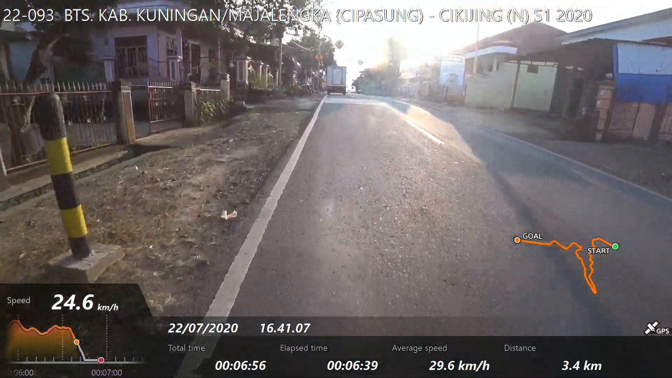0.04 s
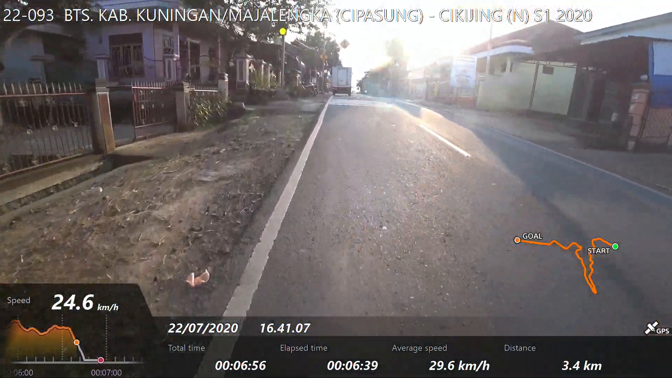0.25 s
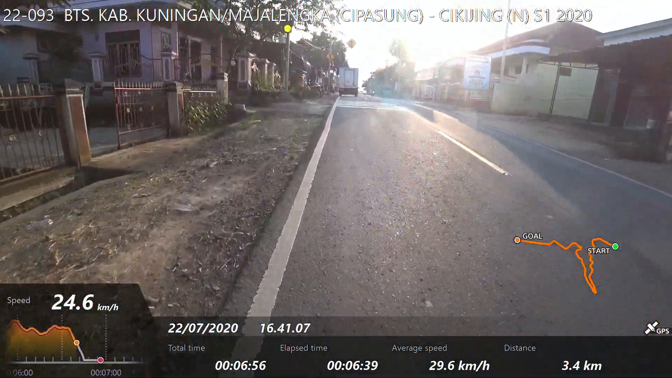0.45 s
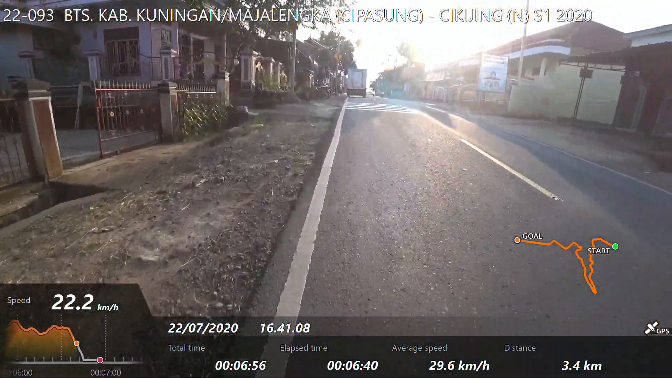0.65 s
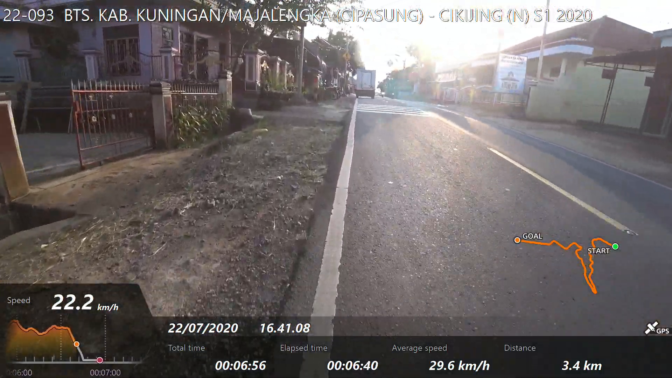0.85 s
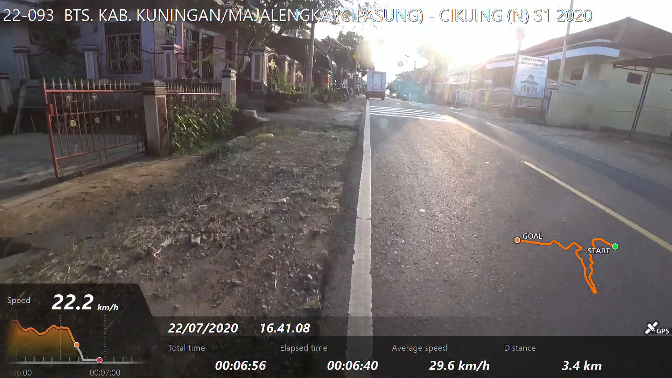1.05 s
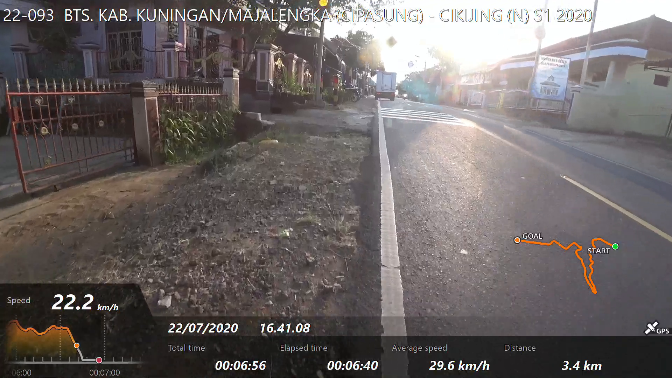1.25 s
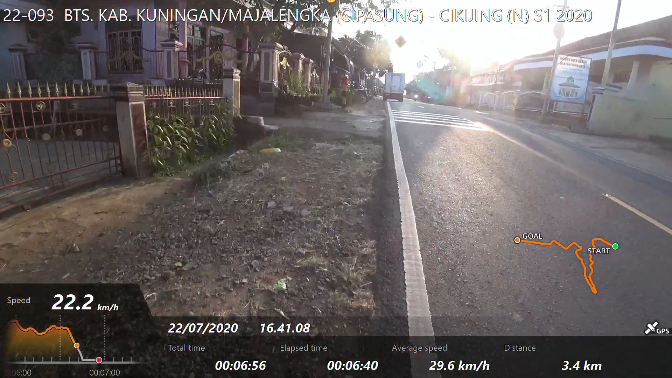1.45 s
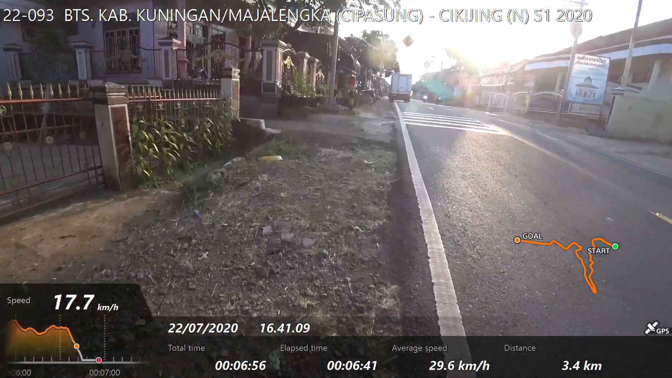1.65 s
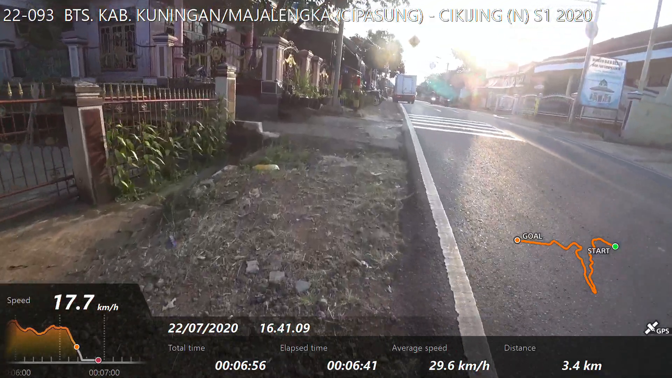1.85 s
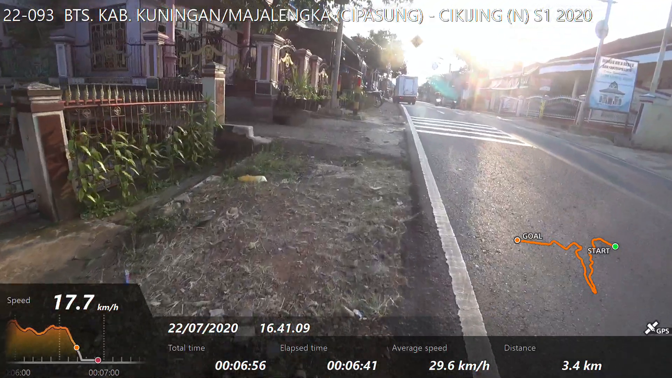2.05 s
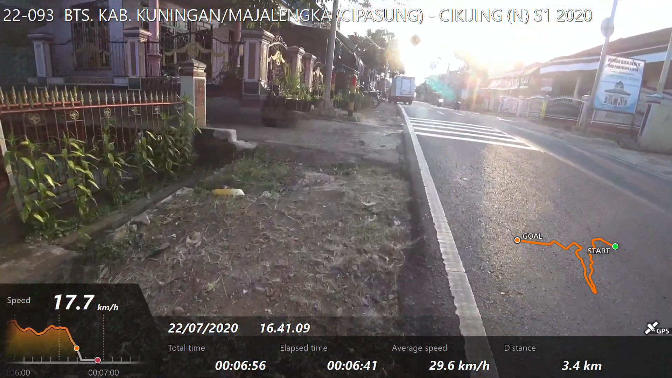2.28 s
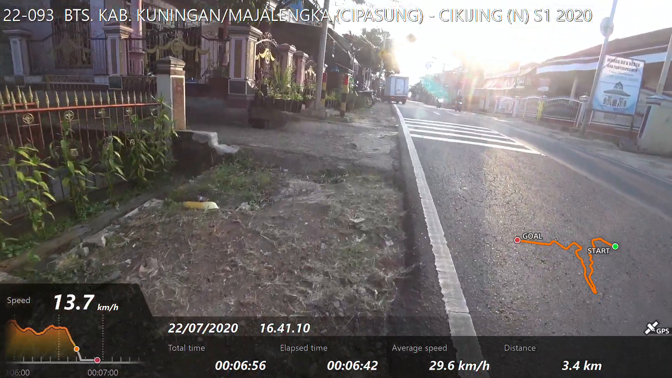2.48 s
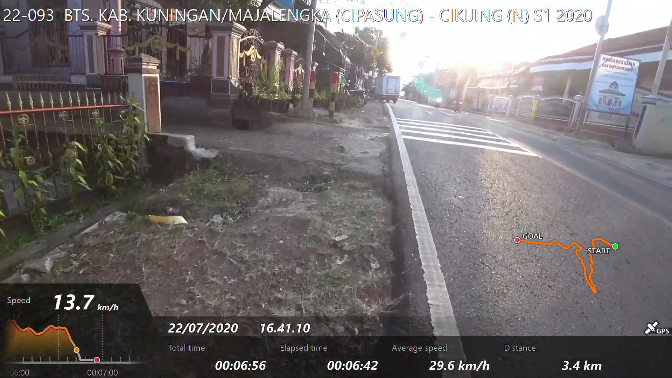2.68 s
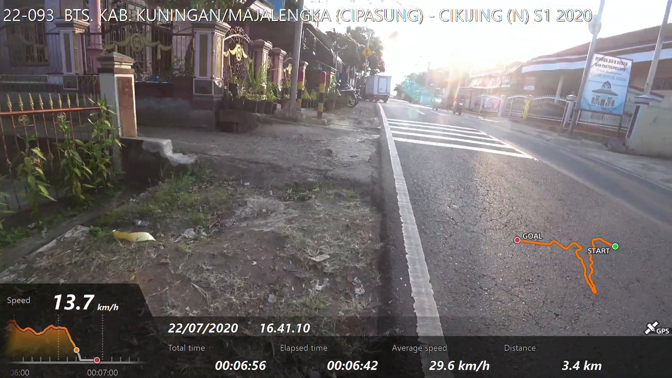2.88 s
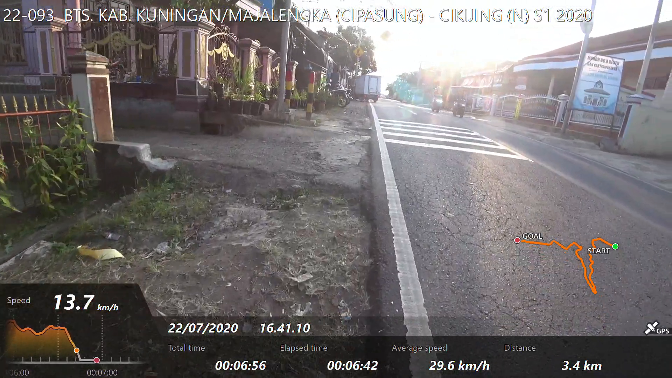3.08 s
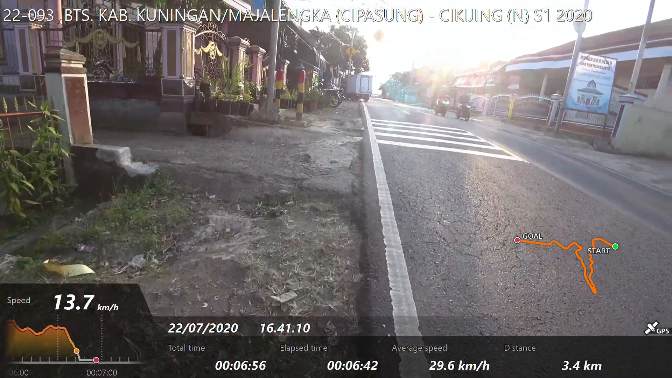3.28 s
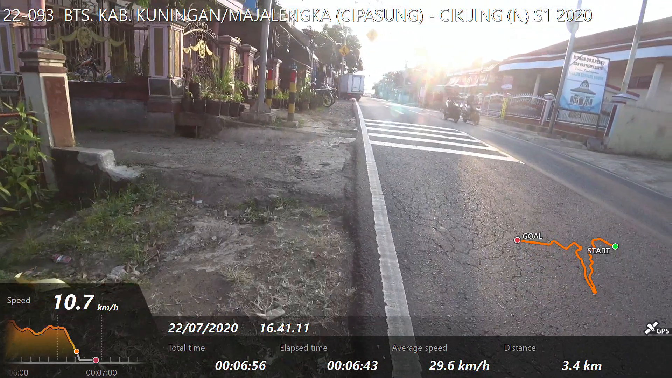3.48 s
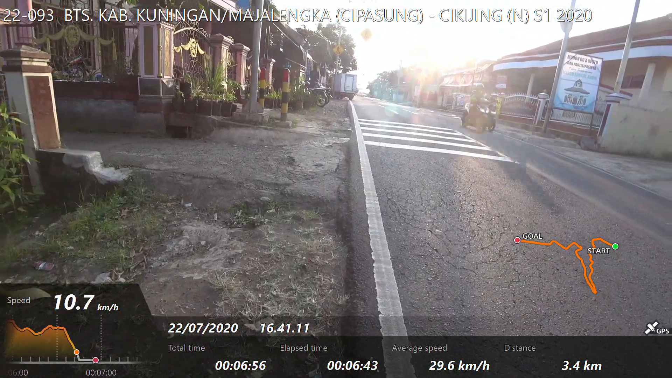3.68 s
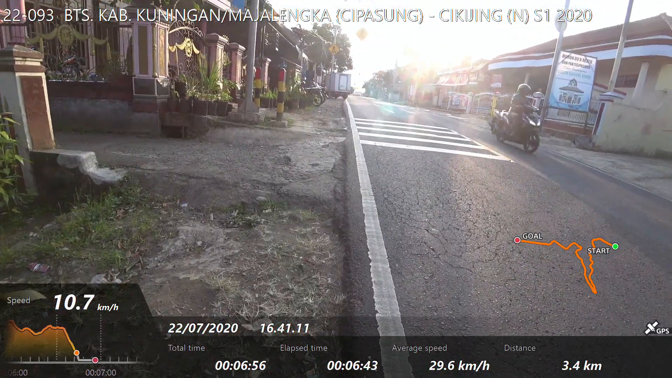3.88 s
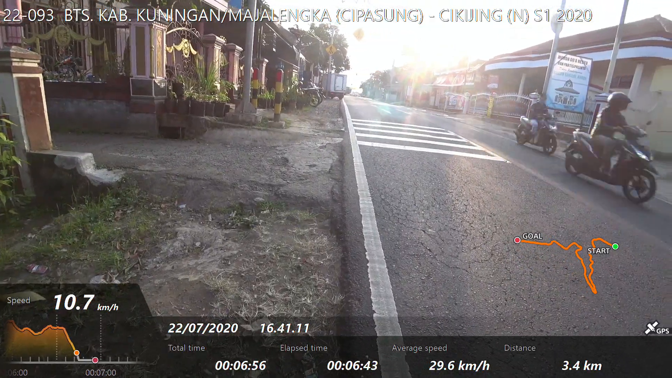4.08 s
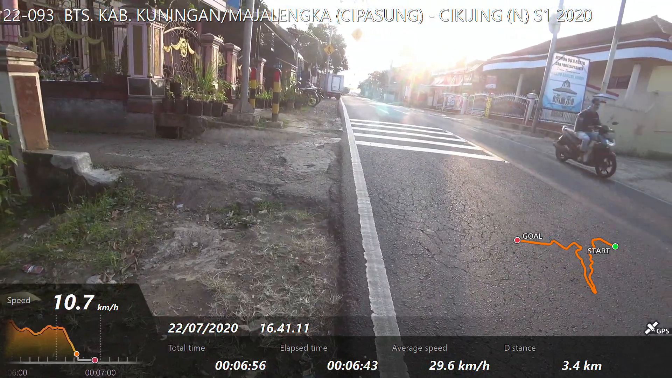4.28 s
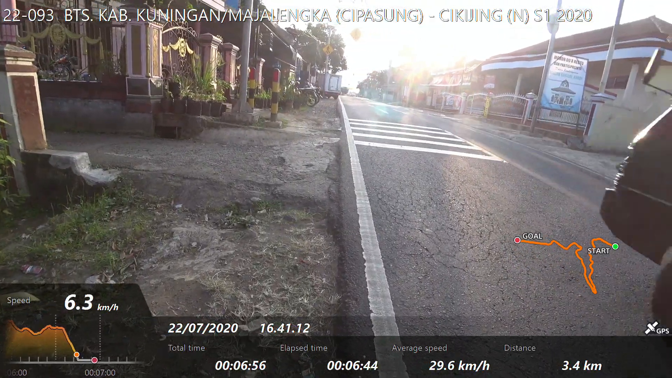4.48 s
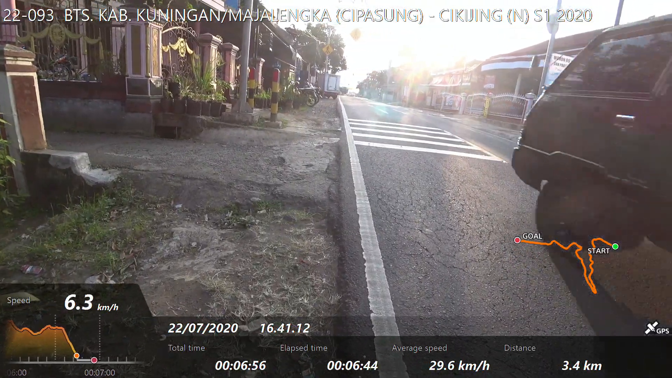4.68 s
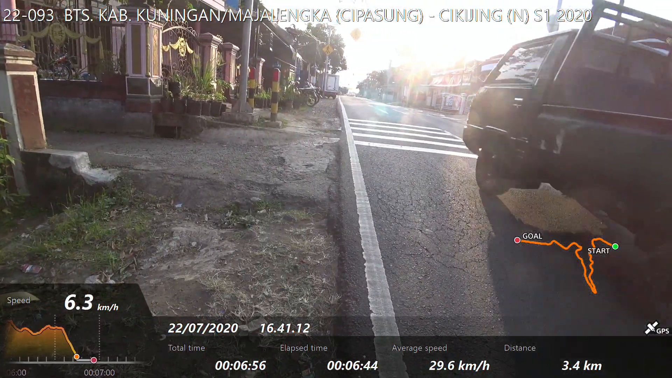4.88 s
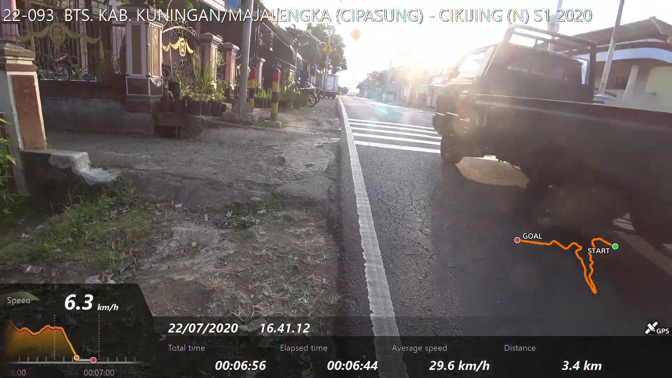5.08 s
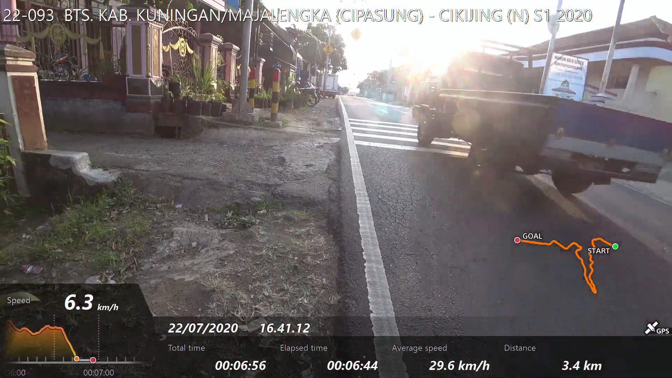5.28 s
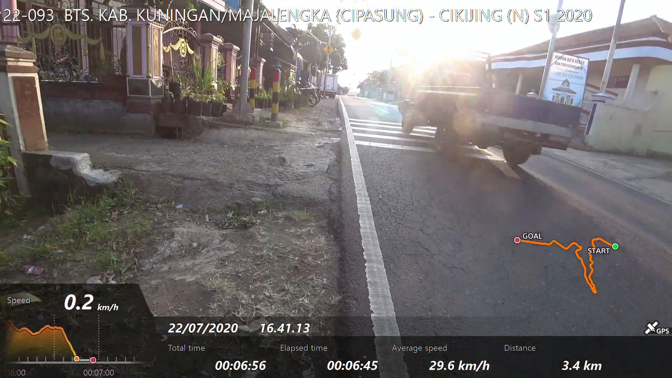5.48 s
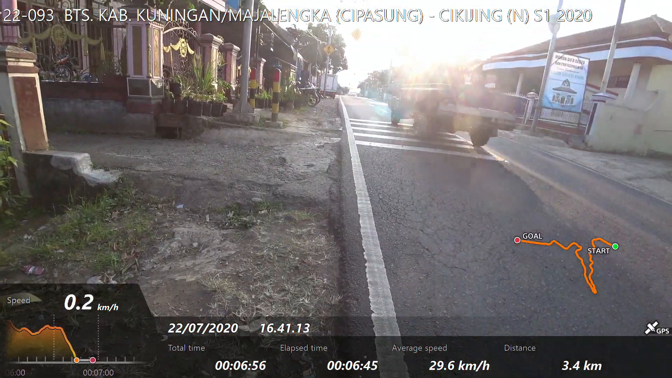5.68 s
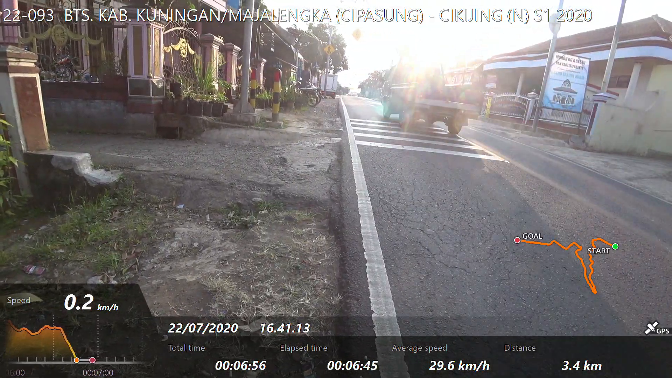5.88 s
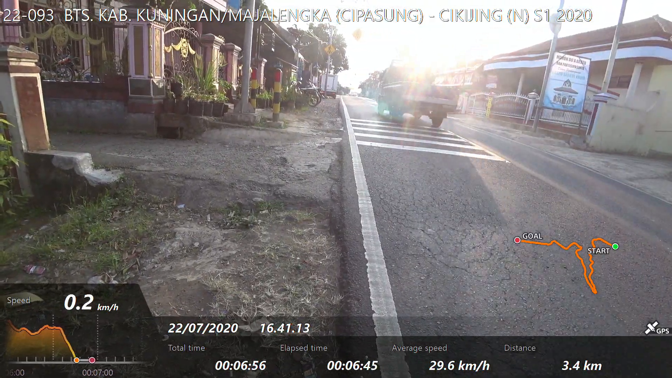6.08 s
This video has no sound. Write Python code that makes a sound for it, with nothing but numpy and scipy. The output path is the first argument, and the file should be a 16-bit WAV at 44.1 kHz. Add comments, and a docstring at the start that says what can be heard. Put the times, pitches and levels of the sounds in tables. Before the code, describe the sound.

A bicycle rolls along a rough village road, heard dully through a housed microphone mounted on it. The tyres thrum, the frame rumbles and the mount clicks over stones and grit. The brakes give a thin ring and a low judder, and the shaking dies away. A motorbike passes the other way, then a small truck overtakes very close, its engine rising in pitch before easing off.

```python
"""Bicycle ride with passing traffic

A camera in a closed housing rides on a bicycle that rolls along a rough village road and brakes to a stop.
Bumps shake the frame and rattle the mount. A motorbike comes the other way; a small truck speeds up from
behind, overtakes closely and lifts off the throttle. The housing keeps the sound dull above 600 Hz."""
import sys
import numpy as np
from scipy import signal
from scipy.fft import rfft, irfft, next_fast_len
from scipy.io import wavfile
from scipy.ndimage import uniform_filter1d, minimum_filter1d

SR = 44100
rng = np.random.default_rng(int(sys.argv[2]) if len(sys.argv) > 2 else 0)


def unload_audio(sound):
    """Save the sound as a 16-bit wav file, at the path given as the first command line argument."""
    columns = np.transpose(np.atleast_2d(sound))
    # keep every value between -1 and 1, then stretch to whole-number steps
    steps = np.round(np.clip(columns, -1, 1) * 32767)
    wavfile.write(sys.argv[1], SR, steps.astype(np.int16))


N = 270774
TIME = np.arange(N) / SR
FFT_SIZE = next_fast_len(N + 4096)
FREQS = np.maximum(np.arange(FFT_SIZE // 2 + 1) * SR / FFT_SIZE, 1)
NOISE_TOP_HZ = 10900


# How hard the road shakes the bicycle, more on the verge, dying away as it brakes: t/s, level/dB
SHAKING = [(0, -4.5), (.95, -2), (1.25, -1.5), (1.48, -4.5), (1.72, -2), (2.3, -1.5), (3.0, -0.5),
           (3.35, -7.5), (4.2, -6.5), (5.0, -20), (6.14, -28)]
# Tone colours (how strong each pitch is) of the tyres, frame and housing: f/Hz, level/dB
THRUM_COLOUR = [(35, -22), (55, -8.5), (76, 2), (100, 3), (130, 0.5), (165, -4), (220, -11.5), (330, -24),
                (700, -65.5)]
FRAME_COLOUR = [(90, -24.5), (180, -3), (260, -3.5), (340, 1.5), (420, 3), (490, 1.5), (570, -3),
                (660, -9.5), (900, -37.5), (1500, -72)]
HOUSING_COLOUR = [(450, -24.5), (620, -9.5), (715, 5), (860, -11), (1020, -8), (1220, -20), (1310, -21),
                  (1390, -14.5), (1480, -27.5), (1650, -31), (2200, -33), (3000, -44), (6000, -60.5),
                  (11000, -65.5)]
# Stony patches of road: t/s, half length/s, frame level/dB, housing level/dB
STONY_PATCHES = [(0.485, 0.034, -23.5, -30.5), (1.145, 0.061, -25.5, -27.5), (1.29, 0.032, -23, -32),
                 (1.622, 0.044, -27, -46), (1.89, 0.037, -20.5, -28), (1.977, 0.15, -19.5, -36),
                 (2.282, 0.052, -24.5, -32), (2.651, 0.052, -20.5, -28.5), (2.774, 0.15, -26, -34.5)]

def bicycle():
    """The rough road makes the tyres thrum, the frame rumble, the housing buzz and a metal part sing."""
    shaking_db = in_time(SHAKING)
    sway = camera_sway(shaking_db)
    thrum = from_db(-24.5 + 1.13 * shaking_db) * steadied(noise(THRUM_COLOUR, FRAME_PATH), seconds=.14)
    stony_frame = swells((s, half_s, db) for s, half_s, db, _ in STONY_PATCHES)
    frame_gain = np.hypot(from_db(-23 + shaking_db), stony_frame)
    rumble = frame_gain * steadied(noise(FRAME_COLOUR, FRAME_PATH), seconds=1)
    stony_housing = swells((s, half_s, db) for s, half_s, _, db in STONY_PATCHES)
    housing_gain = np.hypot(from_db(-34.5 + shaking_db), stony_housing)
    buzz = housing_gain * steadied(noise(HOUSING_COLOUR, FRAME_PATH), seconds=.23)
    singing = from_db(-51.5 + shaking_db) * rms_one(shaken_part(hz=1395, width_hz=55))
    flicker = from_db(1.9 * drift(21))
    return sway + thrum + rumble + singing + buzz * flicker


# Dips in the road, then the draught of passing traffic, swing the camera: t/s, level/dB
LURCHES = [(.6, -25.5), (.79, -22.5), (1.09, -20), (1.21, -22.5), (1.58, -22.5), (1.99, -28), (2.519, -30),
           (2.7, -19), (2.96, -30), (3.26, -31), (3.6, -28.5), (3.82, -29.5), (4.3, -35.5), (4.7, -33),
           (5.15, -40)]

def camera_sway(shaking_db):
    """The camera wobbles on its springy mount with a very deep flutter."""
    lurches = together(from_db(db) * swell(s, half_s=.047) for s, db in LURCHES)
    gain = np.hypot(from_db(-29 + .87 * shaking_db), lurches)
    return gain * steadied(shaken_part(hz=35.7, width_hz=6.6), seconds=.087)


# Clicks of the mount: t/s, level/dB, extra low clack/dB, extra bright edge/dB
MOUNT_CLICKS = [(1.0572, -28, -4, -10), (1.0592, -38, 1, 1), (1.0905, -32, -4, 7), (1.0920, -29, 3, -6),
                (1.1195, -39, 0, 5), (1.1255, -27.5, 2, -8), (1.1281, -41, 6, -3), (1.1610, -37.5, 7, -5),
                (1.1700, -48, 0, 0), (1.1795, -47, -1, -1), (1.1943, -38, 10, 2), (1.1998, -46, 0, 3),
                (2.6270, -53, 12, 5), (2.6768, -41, -3, -3), (2.6836, -32.5, -2, -5),
                (2.7108, -33.5, -4, -9)]
# The notes it rings with: f/Hz, level/dB, time to fade by 60 dB/s
MOUNT_NOTES = [(910, 4, .05), (1010, 5, .07), (1400, -1, .08), (1850, -6, .025), (2200, -7, .02),
               (2900, -8, .014), (3600, -1.5, .006), (4300, 0, .0045), (5100, -1.5, .004), (5950, -2, .004),
               (7600, -6, .0035), (10200, -5.5, .003), (12200, -15, .003), (14600, -18, .002)]
# Colour of the dry buzz after each click: f/Hz, level/dB
MOUNT_BUZZ_COLOUR = [(700, -6), (1000, 6), (1600, -1), (2200, 1), (3000, -3), (4200, -3), (6000, -9),
                     (10000, -17)]

def mount_rattle():
    """On the worst jolts the plastic mount clicks in its joint, rings and buzzes briefly."""
    times, click_db, clack_db, edge_db = np.transpose(MOUNT_CLICKS)
    ringing = np.zeros((2, N))
    for k, (hz, db, ring_s) in enumerate(MOUNT_NOTES):
        blow_db = click_db + db + clack_db * (hz < 2600) + edge_db * (hz > 6800)
        # left and right each pick up the note with a strength of their own
        ringing += (-1) ** k * np.array([strike(times, blow_db, hz, ring_s) for _ in range(2)])
    buzz_s = .2  # time to fade by 60 dB
    dying = together((TIME > s) * from_db(db - 60 * np.abs(TIME - s) / buzz_s)
                     for s, db in zip(times, click_db + clack_db))
    buzz = from_db(-29) * dying * noise(MOUNT_BUZZ_COLOUR, FRAME_PATH)
    return buzz + from_db(-3.5) * stereo(ringing, FRAME_PATH)


# Stones under the wheels: t/s, level/dB
STONE_KNOCKS = [(1.171, -16), (1.278, -17), (1.643, -17), (1.871, -14), (1.881, -15), (1.9103, -7),
                (1.917, -13), (1.9378, -7.5), (1.970, -16), (1.9955, -8), (2.045, -16), (2.224, -16),
                (2.625, -14), (2.651, -16), (2.731, -16), (2.783, -14)]
# The notes the frame rings with: f/Hz, level/dB, time to fade by 60 dB/s
FRAME_NOTES = [(130, -11, .018), (270, -7, .011), (410, -5, .011), (520, -6, .024), (650, -7, .012),
               (820, -14, .01)]

def stone_thuds():
    """Stones knock through the tyres and thud softly in the frame."""
    times, knock_db = np.transpose(STONE_KNOCKS)
    ringing = sum(strike(times, knock_db + db, hz, ring_s) for hz, db, ring_s in FRAME_NOTES)
    muffled = signal.sosfilt(signal.butter(3, 850, fs=SR, output="sos"), ringing)
    return from_db(-1.5) * stereo(muffled, FRAME_PATH)


# How fast the truck's engine turns: t/s, speed/turns per s
TRUCK_SPEED = [(2.1, 24.3), (2.45, 24.9), (2.8, 23.8), (3.1, 24.2), (3.5, 26.7), (4.0, 30.7), (4.5, 34.3),
               (5.0, 37.6), (5.4, 40.2), (5.7, 42.2), (5.8, 42.6), (5.9, 40.3), (6.0, 38.3), (6.14, 36.3)]

def truck():
    """A four-cylinder engine fires twice a turn and climbs in pitch until the driver lifts off."""
    speed = in_time(TRUCK_SPEED)
    crank = turning(speed, jitter=.0019)
    lifted = fade(5.83, 5.92)  # 0 on the throttle, 1 off it
    exhaust = exhaust_boom(crank, speed, lifted) + exhaust_growl(crank, speed, lifted)
    rush = engine_noise(crank, lifted) + truck_tyres()
    return stereo(exhaust, AIR_PATH) + fade(2.65, 3.2) * rush


# The boom eases off behind the bicycle, then grows as the truck passes: t/s, level/dB
BOOM_LEVEL = [(1.7, -41.5), (2.35, -32), (2.6, -33), (3.2, -42), (3.6, -30.5), (4.3, -21.5), (4.9, -20.5),
              (5.8, -21), (6.14, -29.5)]
# Its tones: multiple of engine speed, change coming/dB, change going/dB, change off the throttle/dB
BOOM_TONES = [(2, -3, -3.5, -13), (4, -1, 3, 7), (6, 1, -5, -0.5)]
# Pitches where a tone swells or sinks as it glides through: f/Hz, half width/Hz, change/dB
RESONANCES = [(46.4, 3.4, -9), (70.7, 2.7, 5.5), (105.7, 8, 7), (118, 18, -2), (131.1, 3.5, 5.5),
              (188, 21, -0.5), (238.7, 2.9, 11)]

def exhaust_boom(crank, speed, lifted):
    """The exhaust's low, clean tones change with their pitch, the throttle and the side facing us."""
    tailpipe_s, half_s = 5.06, .059
    past = fade(tailpipe_s - half_s, tailpipe_s + half_s)
    dip_db = -7 * swell(tailpipe_s, half_s)  # a brief dip as the tailpipe goes by
    boom = 0
    for multiple, coming_db, going_db, lifted_db in BOOM_TONES:
        pitch = round(multiple) * speed
        facing_db = coming_db * (1 - past) + going_db * past
        resonance_db = sum(db * np.exp(-((pitch - hz) / width) ** 2) for hz, width, db in RESONANCES)
        level_db = in_time(BOOM_LEVEL) + facing_db + dip_db + resonance_db + lifted_db * lifted
        boom += tone(round(multiple) * crank, level_db, rough_db=1 + 2 * lifted)
    return boom


# The exhaust's higher tones: multiple of engine speed, level/dB
GROWL_TONES = [(3, -13.5), (4, -19.5), (5, -11.5), (7, -11.5), (8, 3.5), (9, -1), (10, 1), (11, -0.5),
               (12, 2.5), (13, -2.5), (14, -5), (15, -9.5), (16, -7.5), (17, -12.5), (18, -8), (20, -6.5),
               (22, -8.5), (24, -8)]
# How the pipe and housing colour them: f/Hz, change/dB
PIPE_COLOUR = [(70, -7.5), (250, 1.5), (310, -7.5), (390, 2), (450, -10), (550, 1), (605, -0.5), (680, -8),
               (900, -23.5)]
# Tones that stand out on meeting a resonance: multiple of engine speed, t/s, half length/s, level/dB
GROWL_SWELLS = [(4, 3.55, .1, -30), (3, 4.85, .16, -32), (5, 4.95, .2, -31.5), (5, 6.0, .08, -32),
                (6, 6.07, .09, -27), (8, 3.66, .16, -27), (8, 4.18, .13, -26.5), (11, 4.76, .17, -23),
                (10, 4.87, .15, -19), (10, 5.2, .08, -23), (16, 4.66, .12, -24), (16, 5.05, .2, -25),
                (14, 5.05, .1, -22.5), (14, 5.34, .13, -22), (12, 5.35, .1, -26.5), (8, 5.48, .13, -25.5),
                (12, 5.74, .13, -25), (14, 5.92, .08, -26), (10, 5.98, .09, -22.5), (18, 4.88, .08, -32),
                (20, 5.1, .2, -42), (24, 5.0, .18, -48)]

def exhaust_growl(crank, speed, lifted):
    """The higher exhaust tones waver under load and smear into noise as the firing turns ragged."""
    ragged = .26 + .7 * lifted  # radians of wobble at ten times the engine speed
    nearness = passing_gain("roar") * fade(2.5, 6.52)
    growl = 0
    for multiple, db in GROWL_TONES:
        steady = nearness * from_db(db - 4.5 + at_hz(PIPE_COLOUR, multiple * speed) + .5 * lifted)
        peaks = swells(row[1:] for row in GROWL_SWELLS if round(row[0]) == round(multiple))
        angle = round(multiple) * crank + ragged * multiple / 10 * drift(25)
        growl += np.hypot(steady, peaks) * tone(angle, 0, rough_db=1.4)
    return growl


# Traffic noise swells once early, again as the motorbike passes, then with the truck's nose, cab and tail: #
# t/s, half length/s, roar level/dB, clatter level/dB, hiss level/dB
PASSES = [(3.633, 0.14, -45, -62.5, -60.5), (4.27, 0.19, -29, -52, -60.5), (4.72, 0.18, -25.5, -57, -60),
          (5.198, 0.22, -26.5, -49.5, -54), (5.657, 0.16, -25, -51.5, -60)]

def passing_gain(part):
    """Loudness of one part of the traffic noise: the roar lingers longest, the hiss is briefest."""
    column, stretch = {"roar": (0, 3.38), "clatter": (1, 1.2), "hiss": (2, .81)}[part]
    return together(from_db(db[column]) * going_by(s, half_s * stretch) for s, half_s, *db in PASSES)


# Colours of the traffic roar, engine clatter and hiss: f/Hz, level/dB
ROAR_COLOUR = [(25, -23), (60, 2.5), (120, -6.5), (230, 2), (310, -3), (400, 0), (560, 1.5), (680, -6.5),
               (850, -18), (1100, -26.5), (1500, -39), (2500, -75.5)]
CLATTER_COLOUR = [(800, -13.5), (1100, -3), (1380, 7), (1600, -3.5), (1850, 5), (2100, 6), (2400, -10),
                  (3000, -16), (5000, -36)]
HISS_COLOUR = [(1500, -1), (2450, 5.5), (2810, 0), (3300, 4.5), (3650, 0.5), (4050, 2.5), (4680, -2),
               (5400, -3), (5900, -2), (6780, -8), (7400, -14), (8320, -12.5), (9200, -21), (11000, -27)]

def engine_noise(crank, lifted):
    """Roar, clatter and hiss pulse with the truck's firings and drop off the throttle."""
    firing = np.cos(2 * crank)
    roar = passing_gain("roar") * steadied(noise(ROAR_COLOUR, AIR_PATH), seconds=.15)
    clatter = passing_gain("clatter") * noise(CLATTER_COLOUR, AIR_PATH)
    hiss_gain = passing_gain("hiss") * from_db(drift(60) - 6 * lifted)
    hiss = hiss_gain * patchy(noise(HISS_COLOUR, AIR_PATH))
    pulsing = roar * (1 + .35 * firing) + clatter * (1 + .14 * firing) + hiss * (1 + .13 * firing)
    return from_db(-2 * lifted) * pulsing


# Colour of the smooth, bright hiss of the truck's rear tyres: f/Hz, level/dB
TRUCK_TYRE_COLOUR = [(1800, -11), (3000, -1), (4000, 2.5), (4700, 1), (5600, -2.5), (6600, -2.5),
                     (7600, -6.5), (8400, -4.5), (9300, -13.5), (11000, -22)]

def truck_tyres(grains_per_s=90):
    """The rear tyres sweep by with a hiss, and fine grit on the asphalt ticks at random."""
    hiss = from_db(-60.5) * going_by(5.23, half_s=.12) * patchy(noise(TRUCK_TYRE_COLOUR, AIR_PATH))
    sizes_db = 3 * np.minimum(rng.exponential(1, N), 3)
    grains = from_db(sizes_db) * rng.choice([-1, 1], N)
    struck = rng.random(N) < grains_per_s / SR
    return hiss + from_db(-9) * passing_gain("hiss") * rms_one(gritty(grains * struck))


# Louder snaps of grit: t/s, level/dB
GRIT_SNAPS = [(4.783, -49), (4.81, -43.5), (5.063, -44), (5.116, -51), (5.315, -44), (5.336, -47),
              (5.3845, -37.5), (5.435, -46), (5.9302, -46)]

def grit_snaps():
    """Single grains crack under the truck's tyres."""
    times, db = np.transpose(GRIT_SNAPS)
    clicks = np.zeros(N)
    clicks[(times * SR).astype(int)] = from_db(db)
    return gritty(clicks)


# How fast the motorbike fires: t/s, rate/firings per s
MOTORBIKE_SPEED = [(0, 47.1), (.9, 48.3), (1.3, 50.2), (1.7, 50), (2.05, 55.3), (2.4, 58.9), (3.6, 59.3),
                   (4.2, 58.9), (4.6, 56), (5.2, 54.5)]
# Its loudness as it nears and goes by: t/s, level/dB
MOTORBIKE_LEVEL = [(0, -40.5), (2.4, -37.5), (3.08, -38.5), (3.22, -31.5), (3.7, -29.5), (4.0, -25),
                   (4.22, -24), (4.38, -34.5), (4.7, -57)]
# Its exhaust tones: multiple of the firing rate, level/dB
MOTORBIKE_TONES = [(2, -11), (3, -14), (4, 3.5), (5, -14), (6, -2.5), (7, -7), (8, -6), (9, -7), (10, -12),
                   (11, -24), (12, -24)]
# Colours of its chain and tyre whirr, and of its tyre hiss: f/Hz, level/dB
WHIRR_COLOUR = [(200, -6), (320, -1), (600, -6), (800, -7.5), (1000, -9), (1250, -26), (1700, -34.5),
                (2500, -57)]
MOTORBIKE_TYRE_COLOUR = [(1500, -13.5), (2500, -1), (2760, -1.5), (3200, 4), (3720, -3), (4110, 2),
                         (4650, 2), (6500, -6.5), (8000, -14.5), (11000, -28)]

def motorbike():
    """A single cylinder picks up speed, holds it, and drops in pitch as it goes by with a hiss."""
    gain = from_db(in_time(MOTORBIKE_LEVEL))
    cycle = turning(in_time(MOTORBIKE_SPEED), jitter=.0027)
    firing = np.cos(cycle)
    exhaust = gain * sum(tone(round(k) * cycle, db, rough_db=1.1) for k, db in MOTORBIKE_TONES)
    # once past, its pipe faces us and booms
    boom = going_by(4.48, half_s=.2) * fade(3.8, 4.2) * tone(2 * cycle, -27, rough_db=1.3)
    whirr = gain * from_db(-9.5) * noise(WHIRR_COLOUR, AIR_PATH) * (1 + .5 * firing)
    # the tyres hiss until it draws level, then fall away
    tyre_gain = from_db(-57.5) * going_by(4.33, half_s=.14) * fade(2.6, 3) * (1 - fade(4.35, 4.42))
    tyres = tyre_gain * noise(MOTORBIKE_TYRE_COLOUR, AIR_PATH) * (1 + .3 * firing)
    return stereo(exhaust + boom, AIR_PATH) + whirr + tyres


# The shudder of the bicycle's brakes: t/s, level/dB
BRAKE_JUDDER = [(2.65, -50), (2.8, -26), (3.0, -27), (3.3, -70)]
# Their thin metallic rings: t/s, half length/s, level/dB, f/Hz
BRAKE_RINGS = [(2.5, .07, -55, 1400), (2.655, 0.04, -42, 1425), (2.743, 0.028, -43, 1410),
               (2.814, 0.045, -46, 1380)]

def brakes(judder_hz=79):
    """The brakes bite with a thin ring and a low judder."""
    judder = tone(turning(judder_hz, jitter=.017), in_time(BRAKE_JUDDER), rough_db=2)
    rings = sum(swell(s, half_s) * tone(turning(hz, jitter=.008), db, rough_db=6)
                for s, half_s, db, hz in BRAKE_RINGS)
    return stereo(judder + rings, FRAME_PATH)


# Patches of grit on the verge: t/s, half length/s, level/dB
GRIT_PATCHES = [(1.02, .02, -54), (1.882, .02, -49.5), (2.234, .014, -52), (2.29, .05, -55),
                (2.52, .04, -58), (2.638, .012, -49), (2.735, .016, -52), (2.79, .018, -53),
                (2.84, .014, -55)]
# Colour of their crunch: f/Hz, level/dB
CRUNCH_COLOUR = [(700, -16), (1400, 7), (2000, 3.5), (2700, -1), (3500, -22), (6000, -23), (10000, -37)]

def grit_crunch():
    """Grit crunches under the bicycle's tyres in short, grainy bursts."""
    patches = sum(from_db(db) * swell(s, half_s) for s, half_s, db in GRIT_PATCHES)
    return patches * from_db(2.4 * drift(200)) * noise(CRUNCH_COLOUR, FRAME_PATH)


# Brief swishes: t/s, half length/s, level/dB
SWISHES = [(.73, .06, -69), (1.778, .05, -66.5)]
# Their colour: f/Hz, level/dB
SWISH_COLOUR = [(2500, -13), (5500, -2), (7500, 1), (10500, 0)]

def swishes():
    """Faint, high swishes come and go as the bicycle rolls."""
    return swells(SWISHES) * noise(SWISH_COLOUR, FRAME_PATH)


# Colour of the background: f/Hz, level/dB
STREET_COLOUR = [(30, -9.5), (120, -3), (500, -3.5), (800, -22.5), (1500, -32), (2800, -45), (5500, -49),
                 (8500, -51), (11000, -55.5)]

def street():
    """The distant street and the microphone's hiss make a steady bed of noise."""
    return from_db(-32) * noise(STREET_COLOUR, AIR_PATH)


# How sound reaches the two microphone openings, through the air and through the frame:
# f/Hz, left lead/radians, left minus right/dB, likeness of the two sides/0 to 1
AIR_PATH = [(20, 1.2, 5, 1), (69.5, 0.35, 3.5, 0.96), (193, 0.81, 3.5, 0.75), (555, 1.41, 2, 0.87),
            (940, 1.57, 3.5, 0.69), (1250, 1.8, -1, 0.77), (1660, 1.5, -0.5, 0.28),
            (2000, 1.88, -0.5, 0.95), (2520, 2.2, 1, 0.2), (4000, 1.77, -3, 0.59), (6140, 1.7, 0, .6),
            (8500, 1.4, -2, 0.18)]
FRAME_PATH = [(30, 0.83, 3, 0.72), (70, 0.61, 3.5, 0.19), (112, 0.98, 2, 0.82), (277, 1.6, 3.5, 1),
              (438, 2.48, 0.7, 0.92), (590, 1.48, 0, 0.92), (730, 3.18, 0.6, 0.89), (885, 2.56, 3, 0.99),
              (1290, 2.74, -3, 0.86), (1700, 2.6, 3.5, 0.59), (2600, 2.46, -3.5, 0.87),
              (6070, 1.4, -2, 0.5), (10000, 2, -0.5, 0.24)]

def microphones(spectrum, path):
    """Turn a spectrum into left and right sound, each with its own timing and strength."""
    side = np.array([[.5], [-.5]])
    lead, balance_db = at_hz(path, FREQS, column=1), at_hz(path, FREQS, column=2)
    return irfft(spectrum * from_db(side * balance_db) * np.exp(1j * side * lead), FFT_SIZE)[:, :N]


def stereo(x, path):
    """Send a sound along a path to both microphones."""
    return microphones(rfft(x, FFT_SIZE), path)


def noise(colour, path):
    """Coloured stereo noise of strength 1, partly shared by both sides."""
    alike = np.clip(at_hz(path, FREQS, column=3), 0, 1)
    pair = np.sqrt(alike) * white() + np.sqrt(1 - alike) * np.array([white(), white()])
    band = (FREQS < NOISE_TOP_HZ) / (1 + (16 / FREQS) ** 4)
    return rms_one(microphones(pair * from_db(at_hz(colour, FREQS)) * band, path))


def shaken_part(hz, width_hz):
    """A springy part, shaken at random, hums around its own pitch."""
    return microphones(white() / (1 + (2 * (FREQS - hz) / width_hz) ** 2), FRAME_PATH)


def gritty(clicks):
    """Give bare clicks the colour of the traffic hiss."""
    colour = from_db(at_hz(HISS_COLOUR, FREQS)) * (FREQS < NOISE_TOP_HZ)
    return microphones(rfft(clicks, FFT_SIZE) * colour, AIR_PATH)


def patchy(x, depth_db=1.5):
    """Each part of the treble surges and sinks on its own."""
    centres = np.log(np.geomspace(2000, 10000, 9))
    spectrum = rfft(x, FFT_SIZE)
    bands = [np.interp(np.log(FREQS), centres, row) for row in np.eye(len(centres))]
    return sum(irfft(spectrum * band, FFT_SIZE)[:, :N] * from_db(depth_db * drift(4)) for band in bands)


def strike(times, levels_db, hz, ring_s):
    """Slightly uneven blows set one note ringing; it fades by 60 dB in ring_s."""
    clicks = np.full(N, 1e-18)
    clicks[(times * SR).astype(int)] = from_db(levels_db + rng.normal(0, .75, len(times)))
    decay, step = from_db(-60 / (ring_s * SR)), 2 * np.pi * hz / SR
    return signal.lfilter([0, np.sin(step)], [1, -2 * decay * np.cos(step), decay * decay], clicks)


def turning(per_s, jitter):
    """Angle of a turn or vibration whose speed wavers a little."""
    return 2 * np.pi * np.cumsum(per_s * (1 + jitter * drift(10.6))) / SR


def tone(angle, level_db, rough_db):
    """One tone whose strength flutters by about rough_db."""
    gain = np.sqrt(2) * from_db(level_db + rough_db * drift(54))
    return gain * np.sin(angle + rng.uniform(0, 2 * np.pi))


def steadied(x, seconds):
    """Even out the slow swells of a vibration, leaving strength 1."""
    power = np.mean(np.atleast_2d(x) ** 2, axis=0)
    return x / np.sqrt(uniform_filter1d(power, int(seconds * SR)) + 1e-12)


def white():
    """Spectrum of a fresh white noise."""
    return rfft(rng.standard_normal(FFT_SIZE))


def drift(hz):
    """A random wander of strength 1, mostly slower than hz."""
    return rms_one(irfft(white() / (1 + (FREQS / hz) ** 2), FFT_SIZE)[:N])


def swell(s, half_s):
    """A bell-shaped rise and fall of height 1 at time s."""
    return np.exp(-((TIME - s) / half_s) ** 2)


def swells(rows):
    """Several swells, each with its own time, half length and level."""
    return together(from_db(db) * swell(s, half_s) for s, half_s, db in rows)


def going_by(s, half_s):
    """Gain of a source on a straight path: 1 at its closest, falling with distance."""
    return 1 / np.hypot(1, (TIME - s) / half_s)


def fade(start, end):
    """Rises from 0 at start to 1 at end."""
    return np.clip((TIME - start) / (end - start), 0, 1)


def together(gains):
    """Unrelated vibrations add in power."""
    return np.sqrt(sum(gain ** 2 for gain in gains))


def in_time(rows):
    """Join a table's points with straight lines over time."""
    return np.interp(TIME, *np.transpose(rows))


def at_hz(rows, hz, column=1):
    """Read a table between its pitches, with octaves evenly spaced."""
    columns = np.transpose(rows)
    return np.interp(np.log(hz), np.log(columns[0]), columns[column])


def from_db(db):
    """Decibels to gain."""
    return 10 ** (np.asarray(db) / 20)


def rms_one(x):
    """Scale to an average strength (rms) of 1."""
    return x / np.sqrt(np.mean(x ** 2) + 1e-20)


def scene():
    """The ride, the two vehicles and the street behind them."""
    ride = bicycle() + swishes() + mount_rattle() + stone_thuds() + grit_crunch() + brakes()
    return ride + truck() + grit_snaps() + motorbike() + street()


def record(dry):
    """The camera's limiter holds down the peaks; the ends are eased and the highest treble is cut."""
    ceiling_db, reaction_s, ease_s, cutoff_hz = -3.2, .004, .005, 16000
    span = int(reaction_s * SR)
    allowed = np.minimum(1, from_db(ceiling_db) / (np.abs(dry).max(axis=0) + 1e-9))
    held = minimum_filter1d(allowed, 2 * span)
    gain = uniform_filter1d(uniform_filter1d(held, span), span)
    from_end_s = np.minimum(TIME, TIME[-1] - TIME)
    eased = np.sin(np.pi / 2 * np.minimum(from_end_s / ease_s, 1)) ** 2
    return signal.sosfilt(signal.ellip(8, .1, 50, cutoff_hz, fs=SR, output="sos"), dry * gain * eased)


dry = scene()
out = record(dry)
unload_audio(out)
```